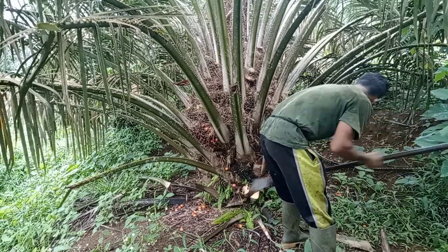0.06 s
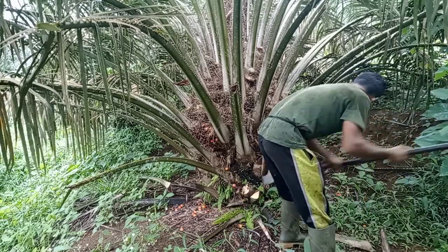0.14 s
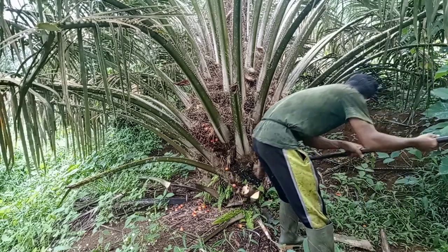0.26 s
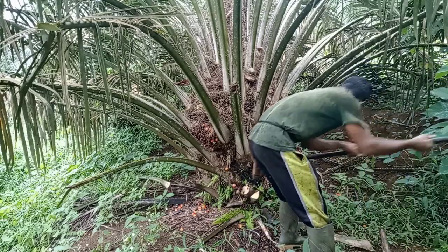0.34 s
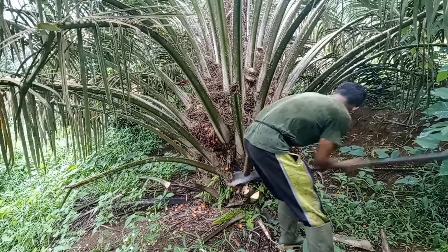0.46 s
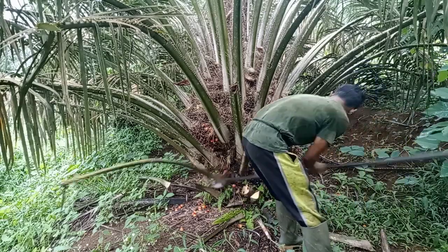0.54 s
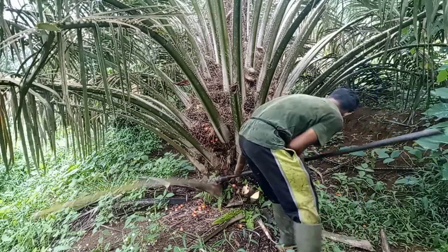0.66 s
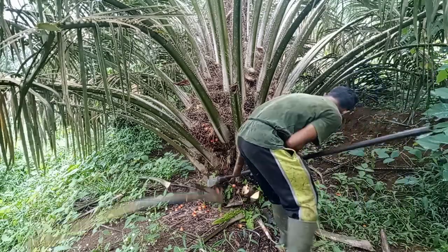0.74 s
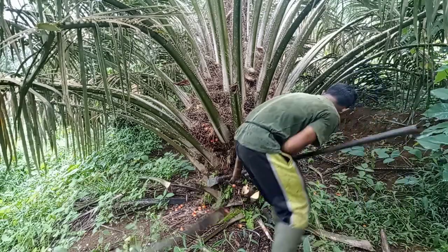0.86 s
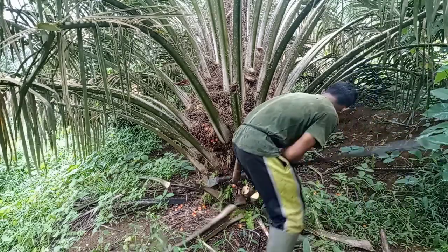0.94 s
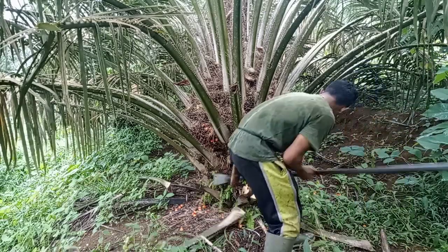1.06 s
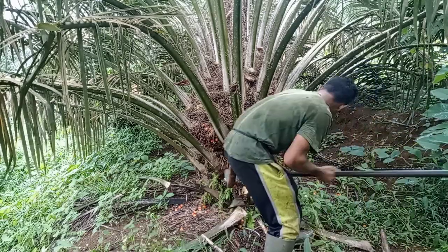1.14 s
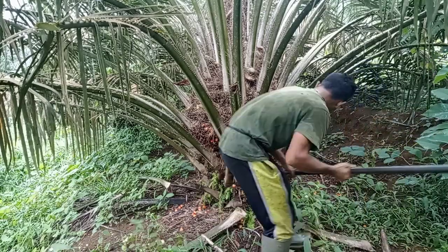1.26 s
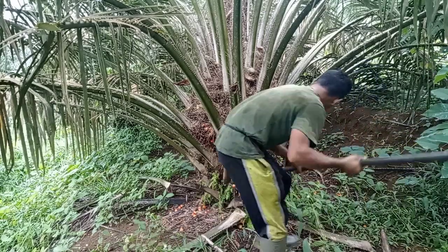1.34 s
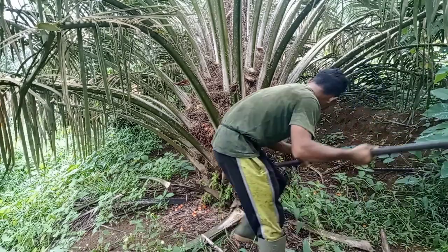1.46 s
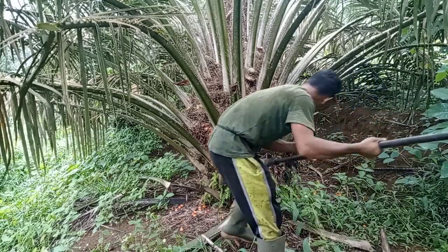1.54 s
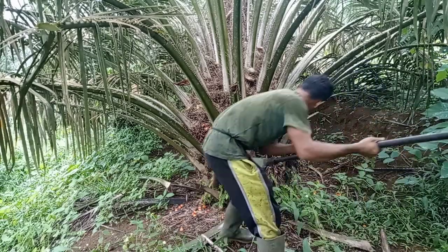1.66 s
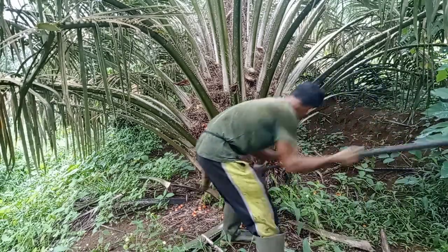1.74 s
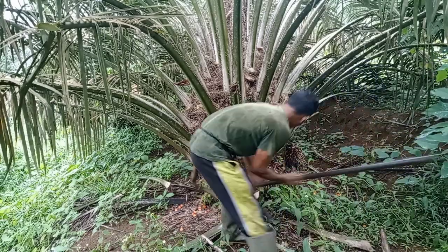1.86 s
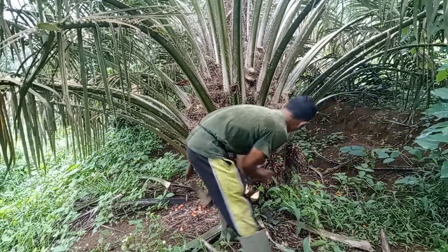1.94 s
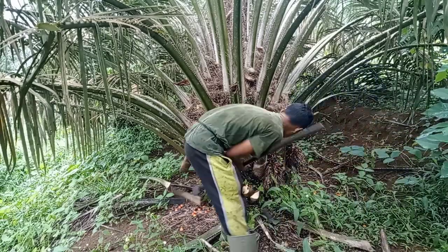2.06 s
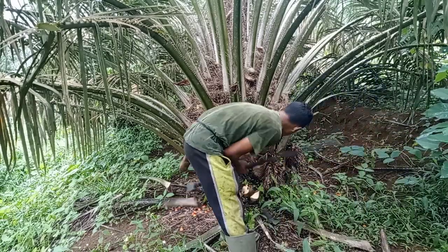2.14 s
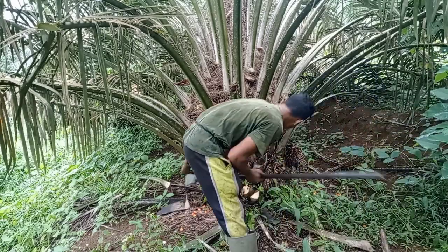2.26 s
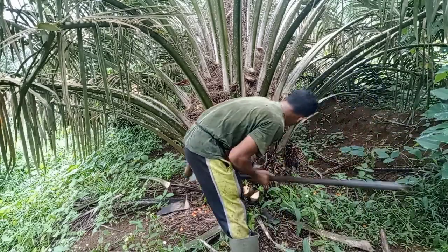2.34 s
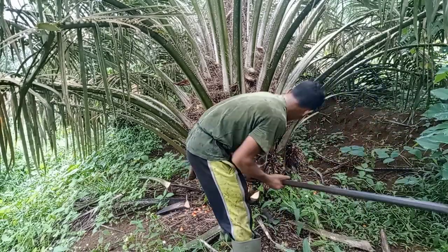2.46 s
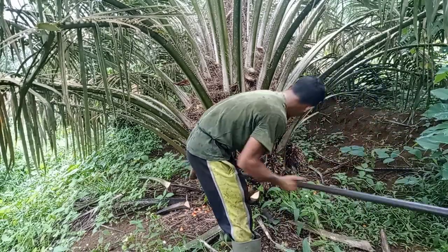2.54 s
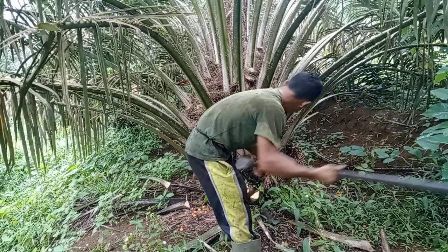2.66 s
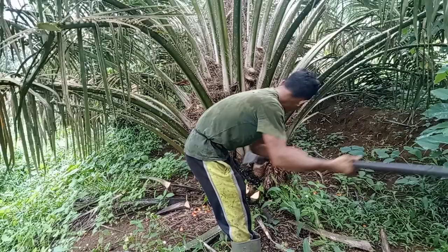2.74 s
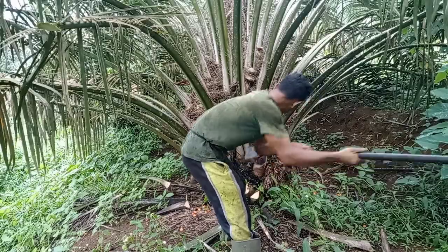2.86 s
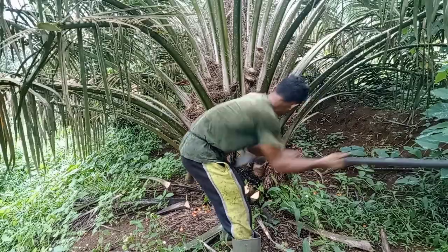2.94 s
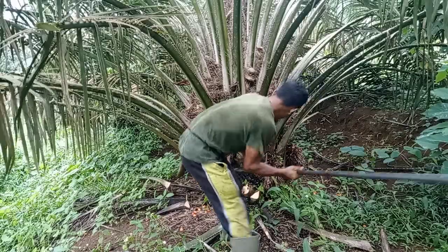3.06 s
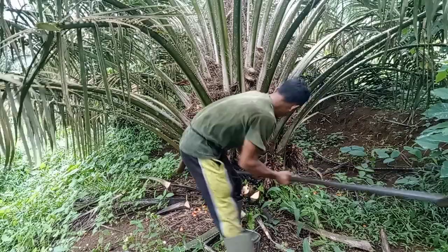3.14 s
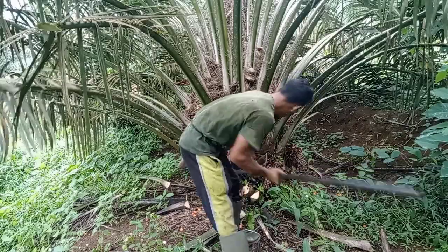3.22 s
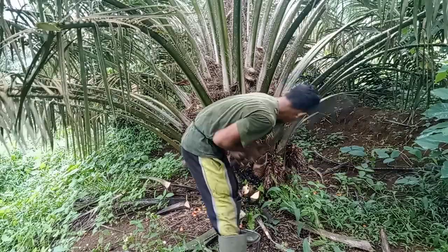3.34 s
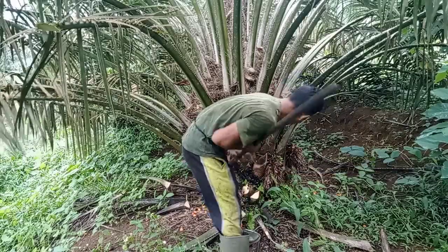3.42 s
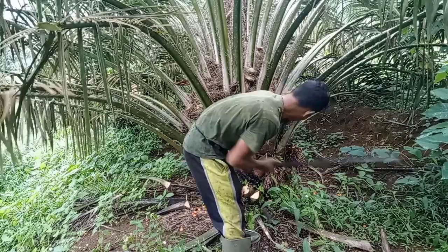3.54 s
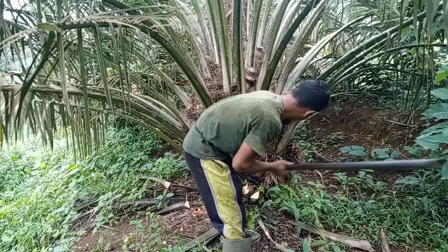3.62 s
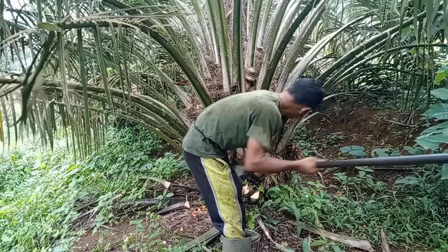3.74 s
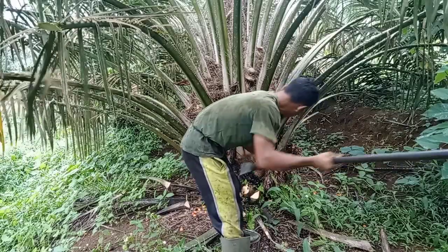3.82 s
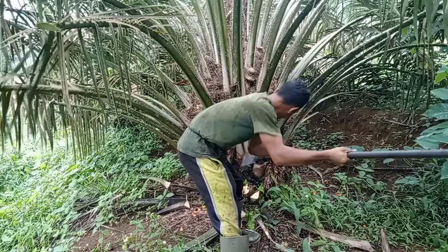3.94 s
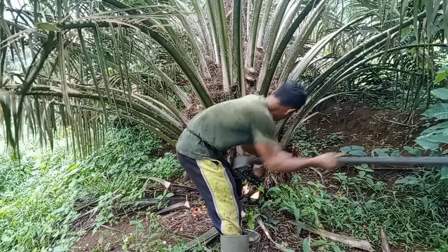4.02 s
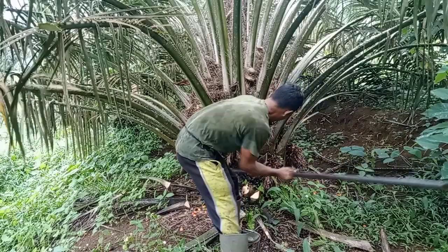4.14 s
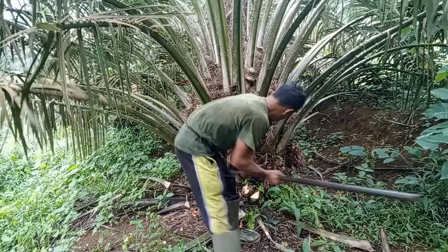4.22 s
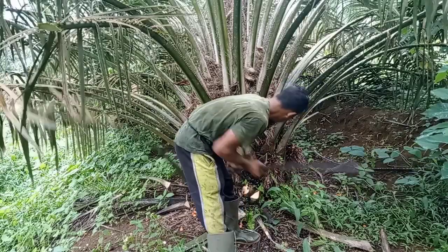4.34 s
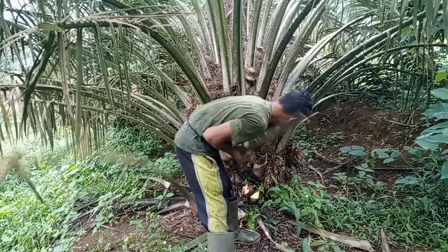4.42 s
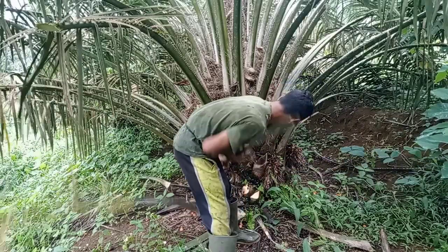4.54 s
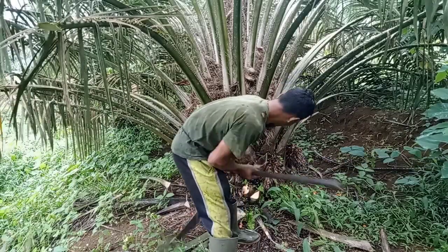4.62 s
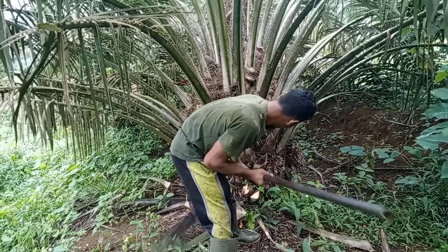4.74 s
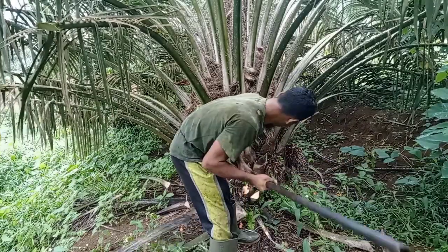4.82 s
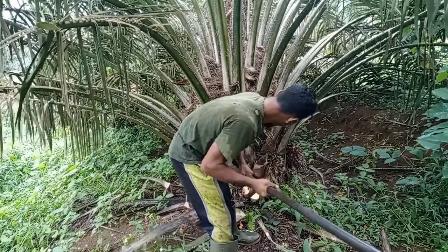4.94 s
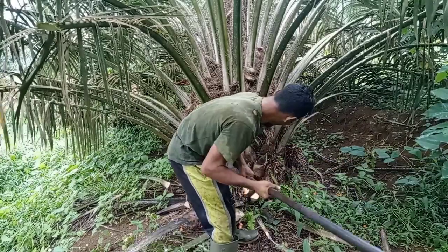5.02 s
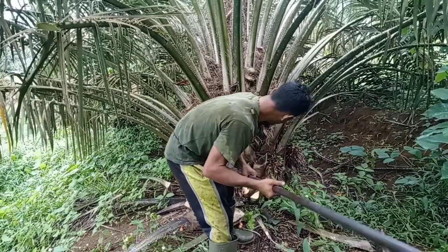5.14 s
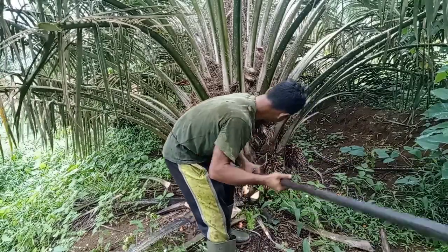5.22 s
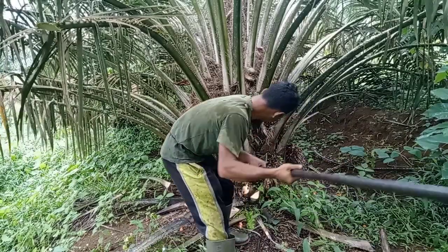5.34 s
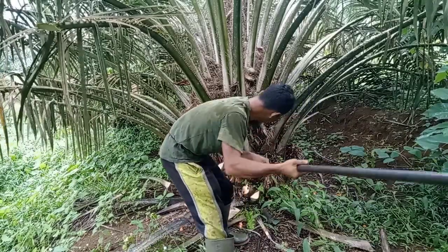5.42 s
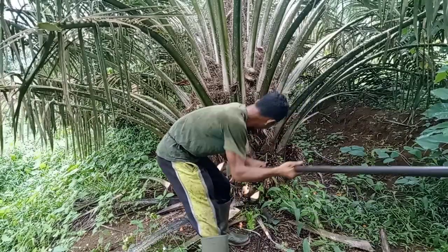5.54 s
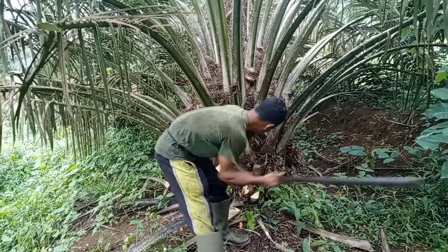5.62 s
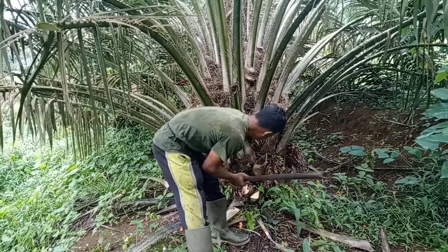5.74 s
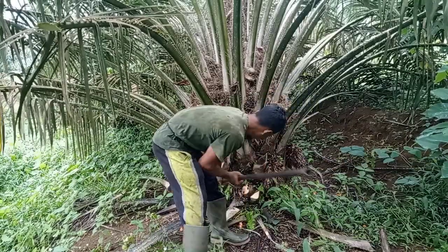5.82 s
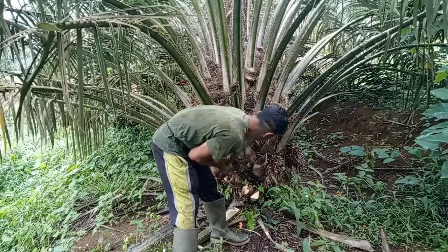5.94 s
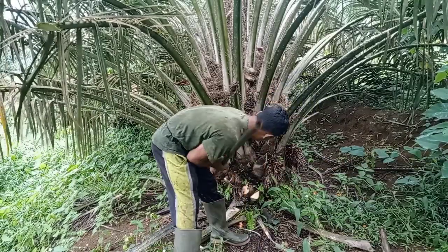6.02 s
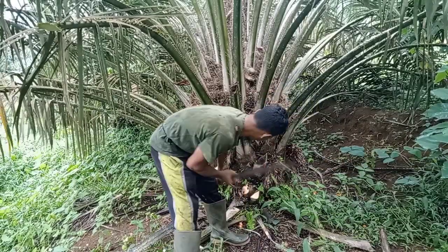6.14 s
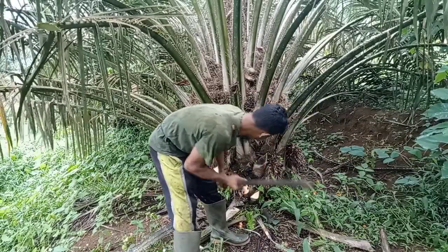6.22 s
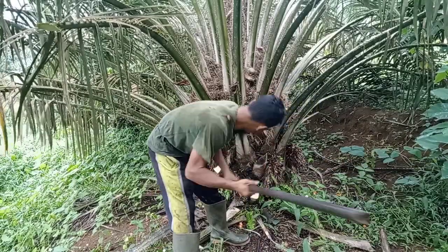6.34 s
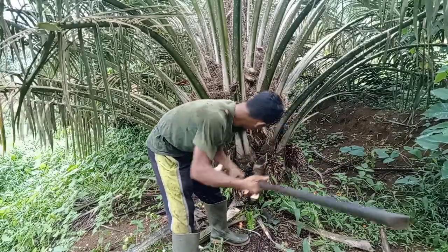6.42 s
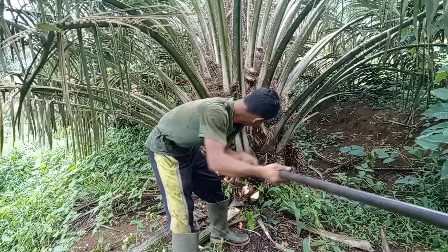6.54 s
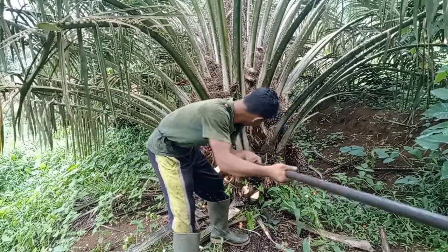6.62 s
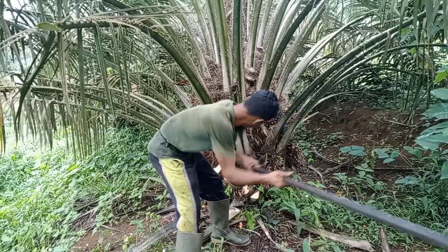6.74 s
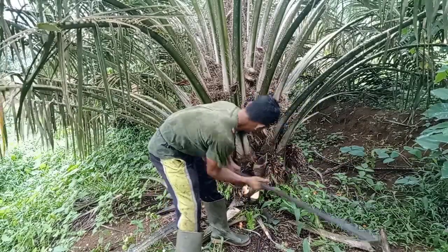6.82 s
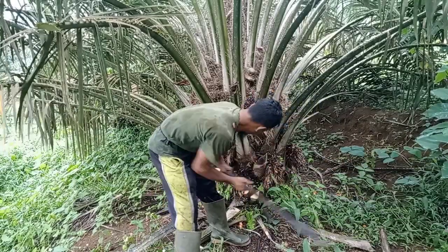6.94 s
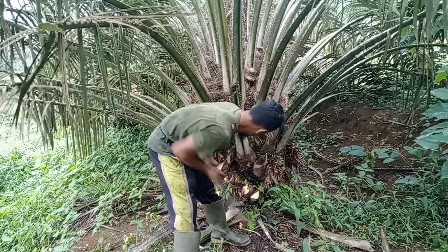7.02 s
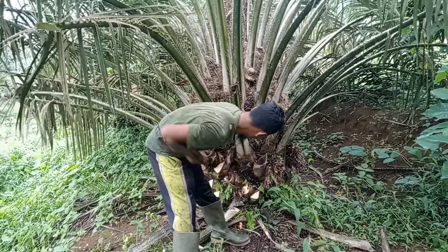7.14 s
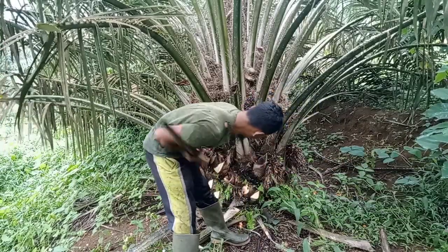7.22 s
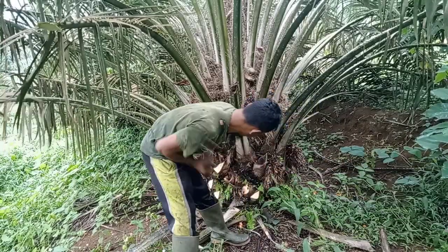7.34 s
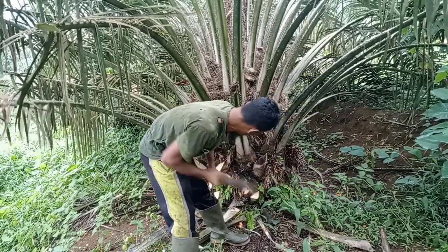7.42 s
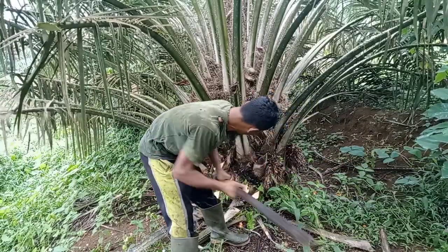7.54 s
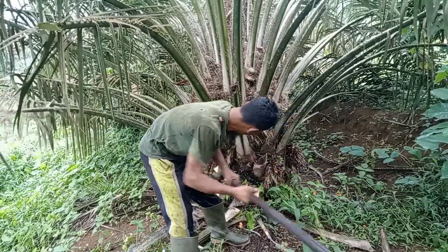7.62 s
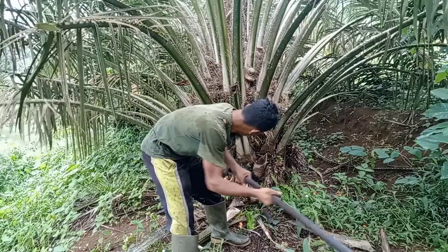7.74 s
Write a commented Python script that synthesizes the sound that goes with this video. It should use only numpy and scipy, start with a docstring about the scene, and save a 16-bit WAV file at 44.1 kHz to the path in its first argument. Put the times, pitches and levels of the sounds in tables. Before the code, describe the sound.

In a palm plantation, close to the microphone, faint fast insect chirps and a distant high drone lie over soft low air. At 0.5 s two quick chisel blows crunch into wet stalk with tiny squeaks; weak rasps of a sagging frond follow at 0.7, then a loud crack at 0.9 and another at 1.15 with leaf rustle. A chop lands at 1.9 and a small snap at 2.2. The near insect pauses around 2.8-3.2. At 3.05 a blow and very sharp crack coincide, then a falling squeal at 3.25 and light rustling. A chop at 4.1 leads to a lower, gritty creak at 4.3; another at 4.7 brings the strongest leaf swish. At 5.7 a longer crunch, creak and faint metallic ring; a dull ringing tap at 6.2. The last chop at 6.85 is followed by a short creak, small snap and fading rustle, with a faint thin tone from 7.5.

```python
"""Among oil palms, close by: a worker drives a long-handled chisel into the frond stalks of one palm.
Each thrust knocks (damped bodies) and crunches through wet fibre (random tiny fractures); the wedged blade
creaks by stick and slip as it is levered, and its pole rings faintly as a set of decaying modes.
Stalks snap with filtered clicks, a frond sags, and leaves rustle as clumps of fine ticks. Around it an insect
chirps in falling sweeps over a distant chorus and low air, both filtered noise; a thin tone comes and goes."""
import sys
import numpy as np
from scipy import signal
from scipy.fft import rfft, irfft
from scipy.io import wavfile
from scipy.ndimage import uniform_filter1d

SR = 44100
rng = np.random.default_rng(int(sys.argv[2]) if len(sys.argv) > 2 else 0)


def unload_audio(sound):
    """Save the sound as a 16-bit wav file, at the path given as the first command line argument."""
    columns = np.transpose(np.atleast_2d(sound))
    # keep every value between -1 and 1, then stretch to whole-number steps
    steps = np.round(np.clip(columns, -1, 1) * 32767)
    wavfile.write(sys.argv[1], SR, steps.astype(np.int16))


N = 342657
TIME = np.arange(N) / SR

# Chisel thrusts. Each row: start in seconds, cutting time in seconds, crunch in dB, knock in dB,
# knock pitch in Hz, thud in dB, trunk shudder in dB.
THRUSTS = [(.517, 0.013, -6, -19.5, 1050, -41, -52.5), (0.59, 0.0029, -13, -29, 503, -27, -42.5),
           (1.893, 0.02, -9, -16.5, 810, -40, -38.5), (3.047, 0.0019, -14, -16, 980, -24.5, -35),
           (4.128, 0.0092, -6.5, -16, 866, -25, -28.5), (4.689, 0.012, -9.5, -20.5, 597, -21.5, -43),
           (5.684, 0.027, -9, -14, 640, -16.5, -41), (6.836, 0.025, -8.5, -16.5, 764, -20.5, -30)]
# The blade levered in the cut. Each row: start in seconds, length in seconds, level in dB, first and last
# slips per second, unevenness in mid-pull from 0 to 1, first and last pitch in Hz,
# resonance in dB before the grip slackens.
PULLS = [(0.542, 0.016, -15, 1000, 960, 0, 1000, 950, 30),
         (0.569, 0.0073, -19, 500, 380, 0.25, 2200, 2200, -13),
         (3.254, .169, -16, 433, 128, 0.01, 1290, 1080, 5),
         (3.497, 0.091, -31.5, 430, 310, 0.28, 1550, 1460, 10),
         (4.273, .2, -15.5, 310, 210, .45, 716, 694, -1),
         (5.772, 0.0133, -24.5, 420, 360, 0.34, 845, 840, 6),
         (5.798, .097, -25, 434, 283, 0.34, 794, 577, 10), (7.008, 0.077, -21, 377, 407, 0.27, 597, 680, 6)]


def from_db(db):
    """Turn decibels into an amplitude factor."""
    return 10 ** (np.asarray(db) / 20)


def rms_one(x):
    """Scale the whole sound to an RMS level of 1."""
    return x / np.sqrt(np.mean(x ** 2) + 1e-20)


def add(out, s, sound):
    """Mix a sound in from time s in seconds."""
    at = max(round(s * SR), 0)
    out[at:at + len(sound)] += sound[:N - at]


def colour(x, points, size=4096):
    """Causal (minimum-phase) filter of unit power gain with the given spectrum."""
    hz, db = np.transpose(points)
    grid = np.maximum(np.fft.rfftfreq(size, 1 / SR), 1)
    bass_fall = np.minimum(grid / hz[0], 1) ** 3   # below the first point
    gain = from_db(np.interp(np.log(grid), np.log(hz), db)) * bass_fall
    # folding the cepstrum onto positive times makes the phase minimal
    cepstrum = irfft(np.log(gain))
    folded = 2 * cepstrum[:size // 2] * (np.arange(size // 2) > 0)
    response = irfft(np.exp(rfft(folded, size)))
    return signal.fftconvolve(x, response / np.linalg.norm(response))[:len(x)]


def resonate(x, hz, width_hz):
    """Resonance of gain 1 on top; its centre may move."""
    turn = np.exp(2j * np.pi * np.cumsum(hz * np.ones(len(x))) / SR)
    r = np.exp(-np.pi * width_hz / SR)
    return 2 * np.real(turn * signal.lfilter([1 - r], [1, -r], x / turn + 1e-18))


def even(x, size=400):
    """Hold the short-term level at 1, over a window of size samples."""
    power = np.abs(uniform_filter1d(x * x, size))
    return x / np.sqrt(power + 1e-6 * np.mean(x * x) + 1e-20)


def drift(per_s):
    """Slow chance with a spread near 1: straight lines between random points, per_s of them a second."""
    return np.interp(TIME * per_s, np.arange(4000), rng.standard_normal(4000))


def grains(per_s, spread_db, count):
    """Random tiny fractures, a few much larger than the rest."""
    sizes = from_db(spread_db * np.minimum(rng.exponential(1, count), 4))
    return (rng.random(count) < per_s / SR) * sizes * rng.choice([-1, 1], count)


def swell(t, hold, rise, t60):
    """Quick rise, a hold, then an exponential fall of 60 dB in t60; all in seconds."""
    return (1 - np.exp(-t / rise)) * from_db(-60 * np.maximum(t - hold, 0) / t60)


def boom(hz, width_hz, count):
    """A heavily damped body shaken at random, with nothing far below its pitch; level 1."""
    high_pass = signal.butter(3, hz / 2, "high", fs=SR, output="sos")
    shake = signal.sosfilt(high_pass, rng.standard_normal(2 * count))
    body = resonate(resonate(shake, hz, width_hz), hz, width_hz)
    return even(body, size=600)[count:]   # the first half lets the body build up


def stalk(x, direct=1):
    """The resonances of the blade and the stalk that grips it colour every contact."""
    # Stalk and blade resonances. Each row: pitch in Hz, width in Hz, level in dB.
    modes = [(437, 12, -5.5), (533, 15, -3.5), (750, 31, -4), (975, 45, -7), (1061, 27, 0),
             (1290, 130, -10), (1770, 46, -9.5), (2286, 23, -8), (2410, 48, -3), (2810, 56, -3.5),
             (3290, 25, -1), (3730, 28, 1.5), (4370, 13, 2.5)]
    return direct * x + sum(from_db(db) * resonate(x, hz, width) for hz, width, db in modes)


def chops(count=12000):
    """The blade knocks on the stalk, tears fibres in bursts until it stops, and leaves the trunk shuddering."""
    # Spectrum of torn wet fibre. Each row: frequency in Hz, level in dB per Hz.
    crunch_spectrum = [(150, -5.5), (400, -8.5), (800, -3.5), (1150, -7.5), (1480, -6.5), (1730, 2),
                       (2500, 1), (3400, 1.5), (4300, -2.5), (5300, -11.5), (6800, -12.5), (8300, -10.5),
                       (9200, -6), (11500, -14), (15500, -20.5)]
    out, t = np.zeros(N), np.arange(count) / SR
    for s, cut, crunch_db, knock_db, knock_hz, thud_db, trunk_db in THRUSTS:
        fractures = grains(4000, 2.7, count)
        tearing = even(colour(stalk(fractures), crunch_spectrum), size=300)
        bundles = from_db(1.5 * drift(220)[:count])   # fibre bundles give way one after another
        depth = from_db(-3.5 * np.maximum(1 - t / cut, 0))   # louder until the blade stops
        crunch = from_db(crunch_db) * tearing * bundles * depth * swell(t, cut, 0.0033, 0.12)

        knock = from_db(knock_db) * boom(knock_hz, 310, count) * swell(t, 0.0056, 0.00093, 0.079)
        thud = from_db(thud_db) * boom(193, 170, count) * swell(t, 0.011, 0.0061, .1)

        shudder_hz = 106 + 45 * np.exp(-t / 0.037) + 20 * drift(110)[:count]
        shudder = np.sin(2 * np.pi * np.cumsum(shudder_hz) / SR)
        trunk = from_db(trunk_db) * shudder * swell(t, 0.063, 0.03, 0.13)
        add(out, s, crunch + knock + thud + trunk)
    return out


def snaps(count=8000):
    """One sharp crack, a hollow knock and a short shower of splinters; each stalk has its own woody pitch."""
    # Stalks snapping. Each row: start in seconds, crack in dB before the woody resonance, its pitch in Hz,
    # knock in dB, splinters in dB before the woody resonance.
    breaks = [(0.8847, 5, 2780, -15.5, -16), (.998, -14.5, 2500, -48, -47), (1.0045, -8, 2500, -27, -25.5),
              (1.038, -16.5, 3400, -54, -31), (1.1441, 1, 3370, -61, -39), (2.198, -18, 2750, -58, -26),
              (3.054, 9.5, 2400, -16.5, -14), (4.504, -15, 2600, -20, -18),
              (5.035, -10.5, 9400, -40, -26.5), (7.146, -21, 2800, -36.5, -34.5)]
    # Spectrum of breaking stalk. Each row: frequency in Hz, level in dB per Hz.
    crack_spectrum = [(150, -20), (600, -14), (1600, -5.5), (2700, -0.5), (4000, -3.5), (5500, -15),
                      (7500, -18), (9300, -5.5), (12000, -18), (15500, -20.5)]
    out, t = np.zeros(N), np.arange(count) / SR
    crack = colour(signal.unit_impulse(count), crack_spectrum)
    crack = crack / np.abs(crack).max()
    for s, crack_db, crack_hz, knock_db, splinter_db in breaks:
        splinters = even(colour(grains(2800, 2.4, count), crack_spectrum))
        splinters = splinters * swell(t, 0.0023, 0.00024, 0.089)
        fracture = from_db(crack_db) * crack + from_db(splinter_db) * splinters
        woody = 0.58 * fracture + 1.4 * resonate(fracture, crack_hz, 900)
        add(out, s, woody + from_db(knock_db) * bump(count))
    return out


def dispersion():
    """The stalk is dispersive: a slip arrives treble first, spread over a few milliseconds."""
    sweep = signal.chirp(TIME[:SR // 250], 15000, 1 / 250, 900, method="hyperbolic")
    phase = np.angle(rfft(sweep, 1024))
    return irfft(np.exp(1j * phase))[:SR // 150]   # all frequencies equally strong


def slip_train(rate, uneven):
    """Sudden slips of the blade, of chance size and spacing; the more uneven, the more they vary."""
    count = len(rate)
    travel = np.cumsum(rate) / SR
    slips, due = np.zeros(count), 0
    for gap, size in rng.standard_normal((400, 2)):
        at = np.searchsorted(travel, due)
        if at < count:
            slips[at] += from_db(7 * uneven[at] * size)
            due += np.exp(uneven[at] * gap)
    return slips


def creak(length, first_rate, last_rate, mid_uneven, first_hz, last_hz, resonance_db, count=13000):
    """Stick and slip: regular slips squeal, uneven ones rasp with grit; rate and pitch move as grip slackens."""
    # Spectrum of blade rubbing on stalk. Each row: frequency in Hz, level in dB per Hz.
    rub_spectrum = [(230, -14), (520, -4.5), (1000, -7), (1600, -6.5), (2400, -1.5), (3900, -7.5),
                    (4900, -15), (7000, -27), (9500, -21.5), (15000, -43.5)]
    even_from, even_until, slack_at = 0.18, .43, 0.79   # shares of the pull
    loose_uneven = .28   # of the slips before and after they settle
    bite_db, grip_db, release_db = -10, 0, -3.5   # at the start, once settled and at the end of the pull
    freed_ring_db = 1.5   # the stalk resonates more as its grip slackens

    t = np.arange(count) / SR
    pull = t / length
    slack = np.interp(pull, [even_until, slack_at], [0, 1])
    settling = [even_from / 2, even_from, even_until, (even_until + slack_at) / 2]
    settled = np.interp(pull, settling, [0, 1, 1, 0])
    uneven = loose_uneven + settled * (mid_uneven - loose_uneven)

    slips = slip_train(first_rate * (last_rate / first_rate) ** slack, uneven)
    drag = signal.lfilter([1], [1, -np.exp(-1 / (.005 * SR))], slips + 1e-18)   # fades within milliseconds
    grit = (.022 + .13 * uneven) * drag * rng.standard_normal(count)
    contact = signal.lfilter(dispersion(), [1], slips) + grit
    rub = colour(stalk(contact, direct=0.41), rub_spectrum)

    pitch_hz = first_hz + slack * (last_hz - first_hz)
    voiced = rub + from_db(resonance_db + freed_ring_db * slack) * resonate(rub, pitch_hz, 180)

    jerk_phase = 2 * np.pi * np.cumsum(72 + 24 * drift(60)[:count]) / SR
    jerks = from_db(8 * uneven * np.sin(jerk_phase))
    stages = [0, even_from, even_until, slack_at, 1]
    effort = from_db(np.interp(pull, stages, [bite_db, grip_db, 0, 0, release_db]))
    return even(voiced, size=700) * jerks * effort * swell(t, length, 0.01 * length, 0.071)


def creaks():
    """The wedged blade is levered in the cut, one stick-and-slip creak for each pull."""
    out = np.zeros(N)
    for s, length, db, *grip in PULLS:
        add(out, s, from_db(db) * creak(length, *grip))
    return out


def sagging():
    """A cut frond hanging by its last fibres gives way in a run of short, weakening rasps."""
    out = np.zeros(N)
    start_s, gap_s, jerk_s = .69, .0355, 0.014
    first_db, loss_db = -28, 1.5   # each jerk is weaker by the loss
    for k in range(4):
        jerk = creak(jerk_s, first_rate=550, last_rate=550, mid_uneven=0.26,
                     first_hz=2200, last_hz=2200, resonance_db=-6)
        add(out, start_s + k * gap_s, from_db(first_db - k * loss_db) * jerk)
    return out


def bump(count=8000):
    """A hollow knock over a lower thud, both heavily damped bodies."""
    t = np.arange(count) / SR
    knock = boom(610, 520, count) * swell(t, 0.0011, 0.00037, 0.053)
    thud = boom(170, 240, count) * swell(t, 0.0067, 0.0023, 0.064)
    return knock + from_db(-9.5) * thud


def bumps():
    """Dull hollow knocks of wood, alone or under a snap."""
    # Dull hollow knocks. Each row: start in seconds, level in dB.
    knocks = [(0.017, -46), (1.055, -32.5), (1.948, -26), (2.2, -34.5), (4.925, -37.5), (6.172, -34),
              (7.317, -38.5)]
    out = np.zeros(N)
    for s, db in knocks:
        add(out, s, from_db(db) * bump())
    return out


def pole():
    """Knocks set the hollow metal pole ringing: a sum of sine modes, each dying away at its own pace."""
    # Knocks on the pole. Each row: start in seconds, level in dB.
    taps = [(0.883, -46), (5.81, -32), (6.175, -33), (7.146, -56)]
    # Pole modes. Each row: pitch in Hz, level in dB relative to the tap, time to fall by 60 dB in seconds.
    modes = [(850, -22, 1.6), (1790, -17.5, 0.56), (2590, 3.5, 0.17), (2700, -22.5, 2.1), (3150, 0, 0.18),
             (3273, -13.5, 0.73)]
    out, t = np.zeros(N), TIME[:SR]
    ring = sum(from_db(db - 60 * t / t60) * np.sin(2 * np.pi * hz * t) for hz, db, t60 in modes)
    for s, db in taps:
        add(out, s, from_db(db) * ring)
    return out


def leaf_motion():
    """Thrusts, levering and separate rustles each set the leaves moving; then they settle again."""
    # Leaf rustles, from short flicks to longer swishes. Each row: start in seconds, length in seconds,
    # level in dB.
    rustles = [(.005, .025, -45.5), (.458, 0.012, -48), (.845, 0.065, -34.5), (1.12, .03, -40.5),
               (1.497, .01, -51), (1.71, 0.025, -49.5), (3.55, 0.2, -42.5), (3.73, 0.37, -43),
               (3.88, 0.01, -36.5), (4.655, .1, -25.5), (4.84, 0.2, -34.5), (5.19, 0.012, -41),
               (6.066, .02, -43), (7.15, .06, -42), (7.33, .33, -52.5)]
    shakes = [(s, 0.087, -44) for s, *_ in THRUSTS]   # every thrust shakes the crown
    drags = [(s, length, -39.5) for s, length, *_ in PULLS]   # as long as the blade is levered
    full_swing_s = 0.049   # leaves moved for less than this settle sooner
    power = np.full(N, from_db(-64.5) ** 2)   # the leaves are never quite still
    for s, length, db in shakes + drags + list(rustles):
        t60 = .4 * np.sqrt(min(length / full_swing_s, 1))
        motion = from_db(db) * swell(TIME[:2 * SR], length, 0.0032, t60)
        add(power, s, motion ** 2)
    swishes = from_db(2 * drift(14))   # the leaves move in uneven swishes
    return np.sqrt(power) * swishes


def fronds():
    """Leaflets brush each other in clumps of fine ticks, with a few sharper flicks."""
    # Spectrum of the leaflets. Each row: frequency in Hz, level in dB per Hz.
    leaf_spectrum = [(88, -36), (150, -10.5), (404, -6.5), (436, -4.5), (631, -6.5), (695, -3.5),
                     (1130, -11.5), (2500, -2), (4060, -2), (5230, -18), (9540, -6), (15500, -22.5)]
    brushing = rms_one(grains(2500, 4.0, N))
    clumps = from_db(1.6 * drift(70))
    flicks = rms_one(grains(70, 3, N))
    brushed = colour(brushing * clumps + .5 * flicks, leaf_spectrum)
    return leaf_motion() * rms_one(brushed)


def near_insect():
    """The nearest insect chirps to an almost steady beat with one pause: two falling sweeps, then a rest."""
    chirps_per_s, beat_wander = 19.97, 0.018
    pause_from_s, pause_until_s, pause_fade_s = 2.82, 3.2, .05
    chirps = np.cumsum(chirps_per_s * (1 + beat_wander * drift(1.8))) / SR
    thirds = 3 * (chirps % 1)   # sweep, sweep, rest
    stroke = thirds % 1
    hz = 4500 - 400 * stroke - 480 * stroke ** 4 + 50 * drift(400)
    phase = 2 * np.pi * np.cumsum(hz) / SR
    gate = (thirds < 2) * np.sqrt(np.abs(np.sin(np.pi * stroke))) * from_db(2.4 * drift(60))
    sweeps = gate * np.sin(phase)
    song = sweeps + 3.2 * resonate(sweeps, 4210, 54)   # the wings ring as each sweep passes their pitch
    overtone = resonate(gate * np.sin(2 * phase), 8500, 400)
    outside_pause = np.maximum(pause_from_s - TIME, TIME - pause_until_s)
    singing = np.clip(outside_pause / pause_fade_s + 1, 0, 1)
    return from_db(-47) * singing * (rms_one(song) + from_db(-21.5) * rms_one(overtone))


def insect_chorus():
    """A distant insect chorus drones: noise in narrow bands, its level slightly unsteady."""
    # Spectrum of the chorus. Each row: frequency in Hz, level in dB per Hz.
    chorus_spectrum = [(3000, -40), (3900, -8), (4380, 2), (4800, -11), (5500, -18.5), (6050, -10),
                       (6750, -4.5), (7600, -24), (8800, -32), (9600, -19), (11000, -32), (13600, -17),
                       (15500, -32)]
    drone = colour(rng.standard_normal(N), chorus_spectrum)
    return from_db(-49.5) * drone * from_db(0.94 * drift(32))


def thin_tones():
    """A faint, steady high sine tone hangs in the air, comes and goes."""
    # Thin tones. Each row: start in seconds, length before the fade in seconds, pitch in Hz, level in dB.
    tones = [(2.22, 0.52, 2824, -62), (7.503, .3, 2880, -59.5)]
    out, t = np.zeros(N), TIME[:2 * SR]
    for s, length, hz, db in tones:
        add(out, s, from_db(db) * np.sin(2 * np.pi * hz * t) * swell(t, length, .03, 0.26))
    return out


def open_air():
    """The air around the palms: steady noise, strongest in the bass."""
    # Spectrum of the air. Each row: frequency in Hz, level in dB per Hz.
    air_spectrum = [(20, -10.5), (45, -5), (64, -1), (90, 3), (130, -4.5), (180, -8.5), (520, -12.5),
                    (1350, -24), (2300, -19), (3200, -14.5), (5000, -35.5)]
    return from_db(-56) * colour(rng.standard_normal(N), air_spectrum)


def grove(x, near_db, near_t60, far_db, far_t60):
    """Ground and trunks scatter the sound at once; the further palms return a longer tail, fuller in the bass."""
    t = TIME[:SR]
    near, far = rng.standard_normal((2, SR))
    near = near * swell(t, 0.0049, 0.0036, near_t60)
    far_spectrum = [(100, 6.5), (1000, -9.0), (3000, -5.5), (6000, -1.0), (15000, -2)]   # Hz, dB per Hz
    far = colour(far, far_spectrum) * swell(t, .03, .02, far_t60)
    echoes = from_db(near_db) * near / np.linalg.norm(near) + from_db(far_db) * far / np.linalg.norm(far)
    return x + signal.fftconvolve(x, echoes)[:N]


def scene():
    """The work sounds close by among the palms, with the insects and the air around it."""
    work = chops() + snaps() + creaks() + sagging() + bumps() + pole() + fronds()
    work = grove(work, near_db=-10, near_t60=0.066, far_db=-19.5, far_t60=0.77)
    insects = near_insect() + insect_chorus()
    insects = grove(insects, near_db=-3.0, near_t60=0.032, far_db=-7.5, far_t60=0.56)
    return (work + insects + thin_tones() + open_air())[None]


def record(dry):
    """The loudest peaks are rounded off; the small microphone loses the deep bass, and the top is cut."""
    ceiling = 1.15
    rounded = ceiling * np.tanh(dry / ceiling)
    bass_cut = signal.butter(2, 55, "high", fs=SR, output="sos")
    top_cut = signal.ellip(10, .2, 70, 15600, fs=SR, output="sos")
    return signal.sosfilt(top_cut, signal.sosfilt(bass_cut, rounded))


dry = scene()
out = record(dry)
unload_audio(out)
```